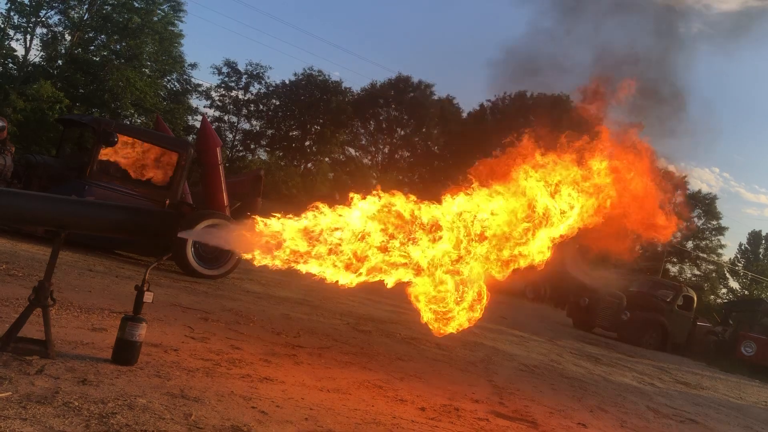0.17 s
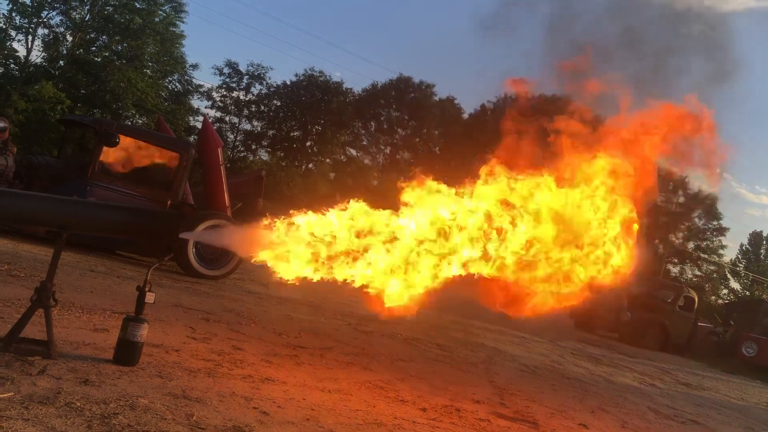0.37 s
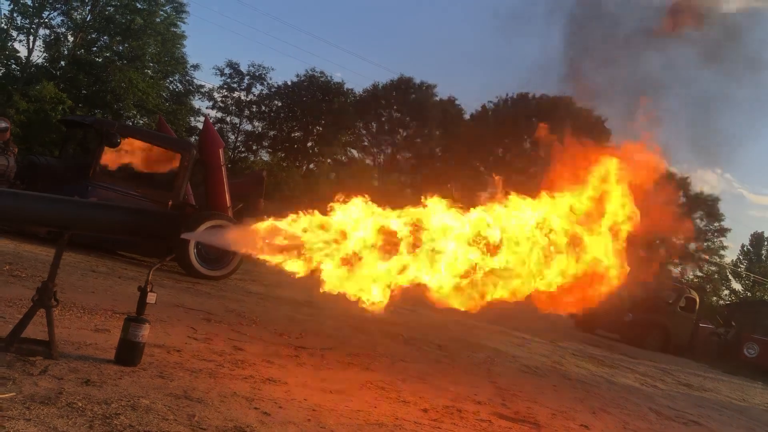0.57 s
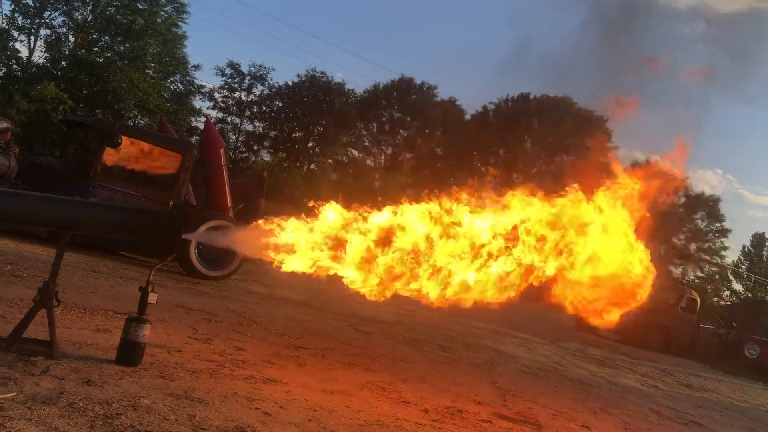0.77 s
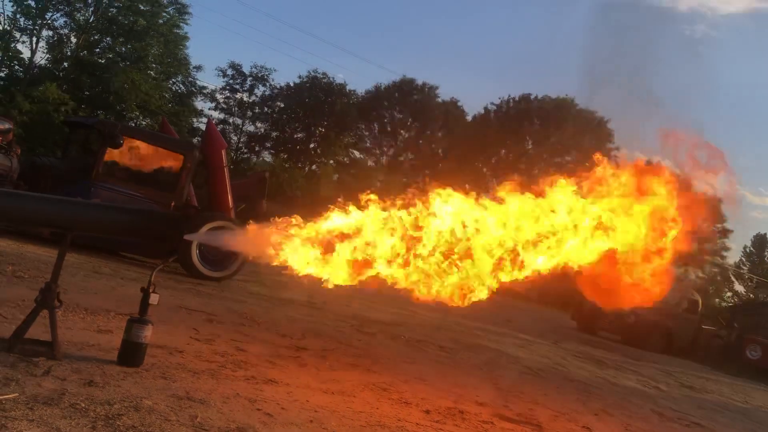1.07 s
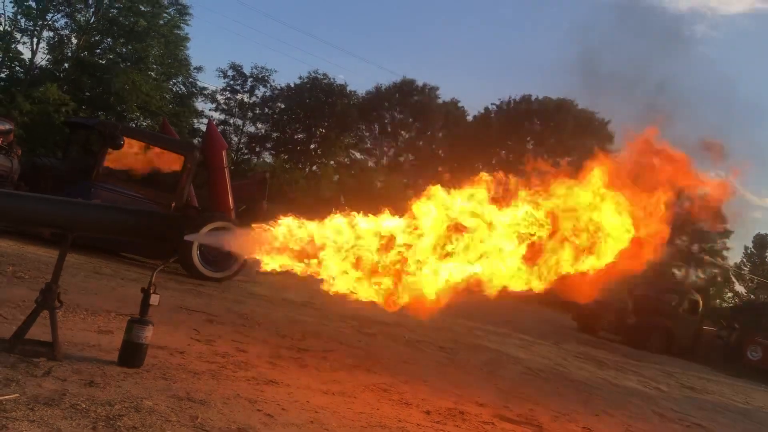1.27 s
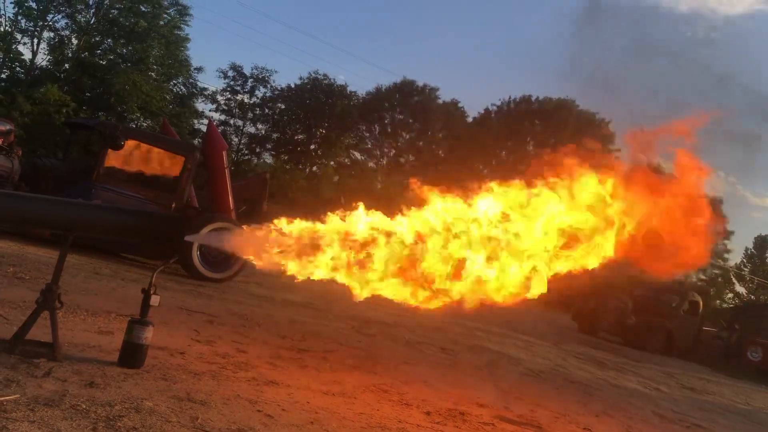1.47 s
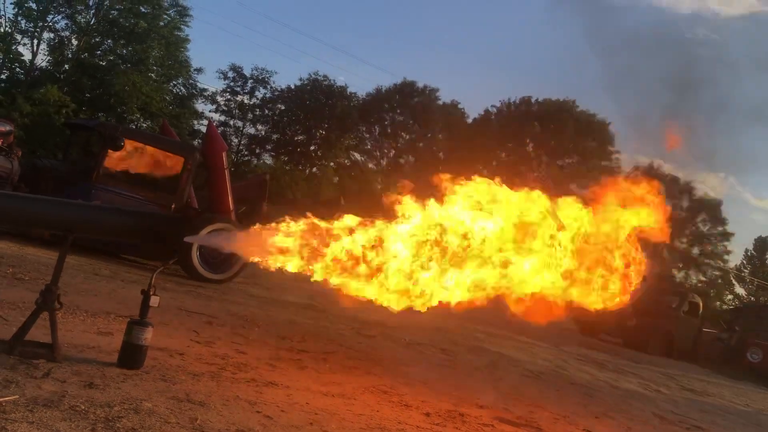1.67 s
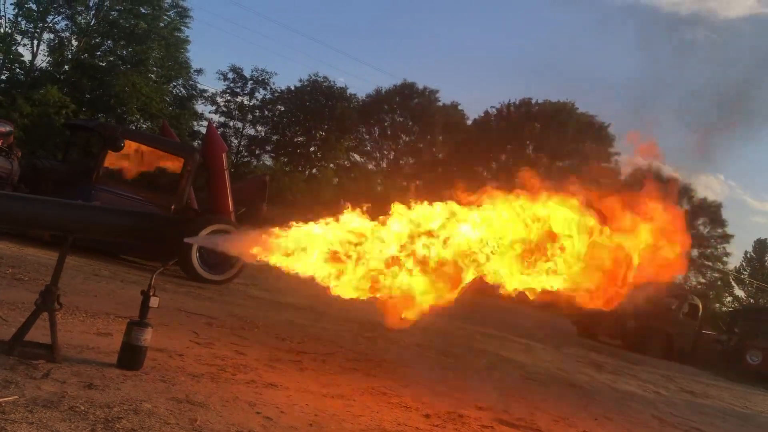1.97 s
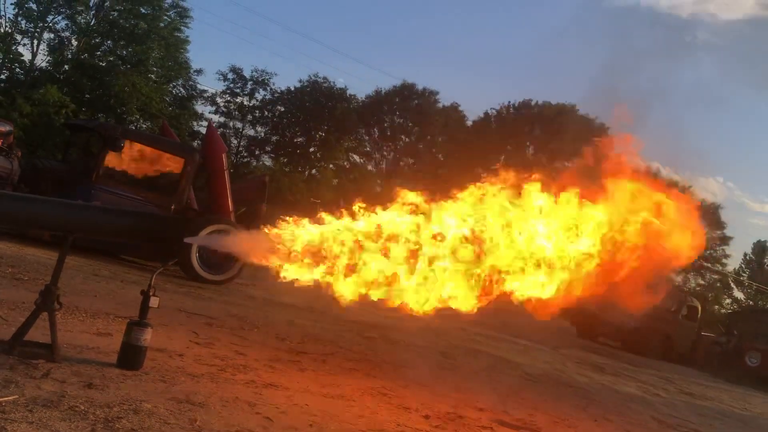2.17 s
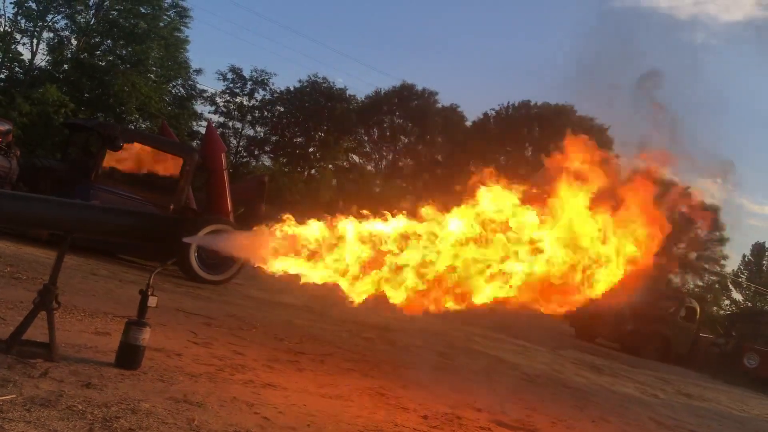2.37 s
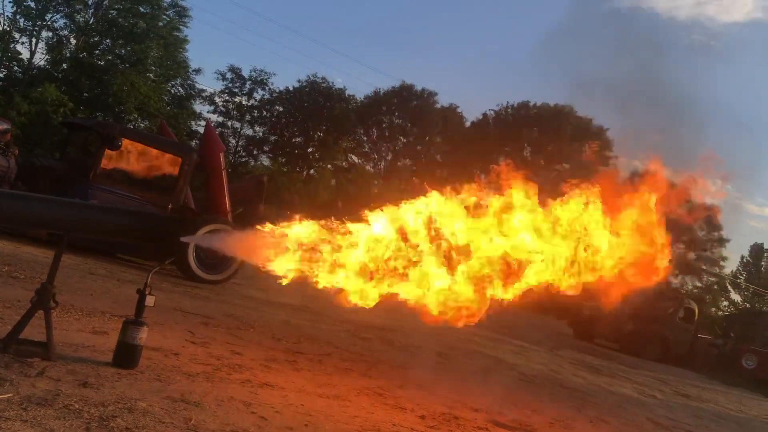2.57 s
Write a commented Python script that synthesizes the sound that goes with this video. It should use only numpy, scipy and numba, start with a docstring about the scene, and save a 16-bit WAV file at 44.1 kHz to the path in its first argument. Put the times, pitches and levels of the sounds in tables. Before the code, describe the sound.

Loud gas burner already at full blast outdoors: heavy, wavering low drone and turbulent rumble, faint hollow tube ringing and strong gas hiss, steady to the end, close microphone slightly squashed by the loudness.

```python
"""Roaring gas burner

A large gas burner throws a steady jet of flame across open ground.
A wavering low tone near 65 Hz makes the throb; shaped noise makes the roar, ringing tube, rush and hiss.
The rush and the nozzle's hiss pulse with each throb and flutter.
The recorder's limiter ducks everything at the strongest surges."""
import sys
import numpy as np
from scipy import signal
from scipy.fft import rfft, irfft
from scipy.io import wavfile
from numba import njit

SR = 44100
rng = np.random.default_rng(int(sys.argv[2]) if len(sys.argv) > 2 else 0)


def master(y):
    """Save y as 16-bit WAV."""
    cut = np.clip(np.atleast_2d(y).T, -1, 1)
    pcm = np.round(cut * 32767)  # scale
    wavfile.write(sys.argv[1], SR, pcm.astype(np.int16))


N = 120393  # length in samples

# Loudness of the throb over time. Each row: time in seconds, level in dB before THROB_DB is added.
THROB_LEVEL = [(0.04, -40), (0.14, -12.5), (0.23, -37), (0.33, -12.5), (0.44, -18), (0.61, -12.5),
               (0.69, -31.5), (0.77, -17), (0.83, -21), (0.94, -10.5), (1.07, -23.5), (1.13, -15.5),
               (1.55, -13.5), (1.58, -20), (2.14, -16.5), (2.27, -22), (2.35, -15), (2.73, -16.5)]
# Speed of the throb over time. Each row: time in seconds, rate in Hz before the wander.
THROB_RATE = [(0.25, 64.2), (0.99, 64.0), (1.09, 62.6), (1.24, 64.8), (1.98, 65.25), (2.07, 64.3),
              (2.29, 64.17), (2.69, 66.1), (2.73, 67)]
# Loudness of the roar over time. Each row: time in seconds, level in dB before ROAR_DB and the swell.
ROAR_LEVEL = [(0.04, -13), (0.98, -12), (1.01, -15), (1.69, -12), (1.79, -16), (1.83, -11), (2.15, -13),
              (2.29, -11.5), (2.32, -9), (2.73, -15)]
# Tone colour of the turbulent burning. Each row: frequency in Hz, relative strength in dB per Hz.
ROAR_SPECTRUM = [(15, -31), (32, -28), (45, -10), (62, -9), (80, -3), (100, 2), (122, -2.5), (155, 1),
                 (195, -5.5), (235, -5), (265, -11), (310, -11.5), (340, -18), (480, -25), (720, -32),
                 (1200, -51), (2500, -79)]
# Resonances of the burner tube. Each row: frequency in Hz, width in Hz, relative strength in dB.
TUBE_RESONANCES = [(364.4, 19, 1), (406, 8.8, -4), (452.7, 16.6, -5), (483.4, 12.5, -8), (536.7, 8.6, -7.5),
                   (583, 14, -10.5), (662, 12, -11.5), (793, 21, -16)]
# Tone colour of the rush at the flame's root. Each row: frequency in Hz, relative strength in dB per Hz.
RUSH_SPECTRUM = [(400, -7.5), (750, -8.5), (1000, -2), (1150, 0), (1370, -0.5), (1600, 0), (1850, -5),
                 (2150, -8.5), (2500, -15), (3300, -21)]
# Tone colour of gas leaving the nozzle. Each row: frequency in Hz, relative strength in dB per Hz.
HISS_SPECTRUM = [(1400, -41), (2300, -13.5), (2500, -12), (2950, -5.5), (3400, -6.5), (3650, -7),
                 (4450, -9), (5150, -2.5), (5480, -1.5), (5800, -5), (6100, -11.5), (6450, -7.5),
                 (6830, -3), (7250, -3), (7550, -8.5), (7900, -7.5), (8450, -4.5), (8950, -1.5), (9350, -4),
                 (9780, -17.5), (10000, -7), (10300, -4.5), (10950, -3.5), (11420, -9), (11800, -6.5),
                 (12130, 1), (12850, -2.5), (13100, -16), (13450, -3), (13760, 6), (13950, -6),
                 (14130, 2.5), (14550, -2.5), (14950, -4), (15300, -1.5), (15660, -1)]
# Loudness of the hiss over time. Each row: time in seconds, level in dB before HISS_DB and the motions.
HISS_LEVEL = [(0.06, -20.5), (0.61, -18.5), (0.63, -18.5), (0.97, -20), (1.04, -20), (1.37, -19.5),
              (1.46, -19.5), (1.97, -21), (2.28, -18.5), (2.51, -20), (2.54, -19.5), (2.73, -20)]
# Reflections from the ground and the burner's frame. Each row: delay in seconds, level in dB.
ECHOES = [(.0031, -26), (.0074, -17.5), (0.0129, -16.5), (0.0237, -16)]

# Levels in dB: THROB_DB, ROAR_DB and HISS_DB are added to the level tables
THROB_DB, ROAR_DB, TUBE_DB, RUSH_DB, HISS_DB = 0.5, 1.25, -26, -26.5, 1
# How far the levels move, in dB
ROAR_SWELL_DB = 0.5
RUSH_PULSE_DB, RUSH_FLUTTER_DB = 1.1, 1.33
HISS_PULSE_DB, HISS_FLUTTER_DB, HISS_PATCHY_DB, SPIT_DB = 1.0, 0.21, 0.76, 0.72
# How fast they move, in Hz
FLUTTER_HZ, SPIT_HZ = 70.4, 600
THROB_WANDER = 0.02  # spread of the throb's rate, as a fraction
START_S, ATTACK_S = 0.0358, 0.0013  # silence before the sound, then a quick fade-in
LIMIT, LIMIT_ATTACK_S, LIMIT_RELEASE_S = 0.67, 0.00042, 0.047  # limiter threshold (full scale 1) and times
CEILING = 0.88  # rounded peaks stay below this (full scale 1)
TOP_HZ = 15750  # highest frequency kept


def undb(db):
    """Turn dB into a plain multiplier."""
    return 10 ** (np.asarray(db) / 20)


def unit(x):
    """Scale to an average (rms) strength of 1."""
    return x / np.sqrt(np.mean(x ** 2))


def frequencies():
    """Frequency in Hz of each spectrum bin of the whole sound."""
    return np.fft.rfftfreq(N, 1 / SR)


def noise_spectrum():
    """Spectrum of fresh white noise."""
    return rfft(rng.standard_normal(N))


def curve(rows):
    """Join rows of (seconds, value) by straight lines."""
    return np.interp(np.arange(N) / SR, *np.array(rows, float).T)


def walk(hz):
    """Smooth random wander of spread 1, with changes up to about hz."""
    f = frequencies()
    gain = (f > 0) / np.sqrt(1 + (f / hz) ** 4)
    return unit(irfft(noise_spectrum() * gain, N))


def turbulence(points):
    """Noise with a spectrum of (Hz, dB) points, falling steeply beyond its ends."""
    f = frequencies() + 1  # the extra 1 Hz avoids the logarithm of zero
    hz, db = np.array(sorted(points), float).T
    shape = undb(np.interp(np.log(f), np.log(hz), db))
    low_edge = np.minimum(f / hz[0], 1) ** 4
    high_edge = np.minimum(hz[-1] / f, 1) ** 4
    return unit(irfft(noise_spectrum() * shape * low_edge * high_edge, N))


def bands(x, count):
    """Split a sound into equally wide bands up to TOP_HZ; the last also takes what lies above."""
    spectrum = rfft(x)
    index = np.minimum(frequencies() * count // TOP_HZ, count - 1)
    return [irfft(spectrum * (index == k), N) for k in range(count)]


@njit
def follow(x, attack, release):
    """Follow the peaks of a sound: quick up, slow down."""
    out, level = np.empty(len(x)), 0.
    for i in range(len(x)):
        step = attack if x[i] > level else release
        level += (x[i] - level) * step
        out[i] = level
    return out


def throb(cycle):
    """The flame and the burner tube swing together in one low tone."""
    tone = np.sqrt(2) * np.sin(cycle)  # rms 1
    return tone * undb(curve(THROB_LEVEL) + THROB_DB)


def roar():
    """Big burning eddies rumble and swell."""
    level_db = curve(ROAR_LEVEL) + ROAR_DB + ROAR_SWELL_DB * walk(hz=32)
    return turbulence(ROAR_SPECTRUM) * undb(level_db)


def tube():
    """The turbulence rings the burner tube: noise passes through its narrow resonances."""
    f = frequencies()
    rings = 0
    for hz, width, db in TUBE_RESONANCES:
        resonance = undb(db) / (1 + 2j * (f - hz) / width)
        rings = rings + resonance * noise_spectrum()
    return unit(irfft(rings, N)) * undb(TUBE_DB)


def rush(pulse, flutter):
    """Small eddies at the root of the flame pulse and flutter with the gas flow."""
    level_db = RUSH_DB + RUSH_PULSE_DB * pulse + RUSH_FLUTTER_DB * flutter
    return turbulence(RUSH_SPECTRUM) * undb(level_db)


def hiss(pulse, flutter):
    """Gas hisses from the nozzle, pulsing with the throb, fluttering and spitting finely."""
    gas = 0
    for band in bands(turbulence(HISS_SPECTRUM), count=6):
        gas = gas + band * undb(HISS_PATCHY_DB * walk(hz=60))  # each band flickers on its own
    motion_db = HISS_PULSE_DB * pulse + HISS_FLUTTER_DB * flutter + SPIT_DB * walk(SPIT_HZ)
    return gas * undb(curve(HISS_LEVEL) + HISS_DB + motion_db)


def surroundings(x):
    """Nearby surfaces add faint delayed copies that ripple the spectrum."""
    f = frequencies()
    response = 1 + sum(undb(db) * np.exp(-2j * np.pi * f * delay) for delay, db in ECHOES)
    return irfft(rfft(x) * response, N)


def scene():
    """Add the throb, roar, tube, rush and hiss of one flame; only the hiss gets reflections."""
    rate = curve(THROB_RATE) * (1 + THROB_WANDER * walk(hz=7.8))
    cycle = 2 * np.pi * np.cumsum(rate) / SR
    pulse = -np.sin(cycle)  # the gas flows fastest when the pressure is low
    flutter = walk(FLUTTER_HZ)  # shared by the rush and the hiss
    flame = throb(cycle) + roar() + tube() + rush(pulse, flutter)
    flame = flame + surroundings(hiss(pulse, flutter))
    fade_in = np.clip((np.arange(N) / SR - START_S) / ATTACK_S, 0, 1)
    return (flame * fade_in)[None]


def record(dry):
    """A limiter holds down the surges, the last peaks are rounded, and the top is cut."""
    attack = 1 - np.exp(-1 / (LIMIT_ATTACK_S * SR))
    release = 1 - np.exp(-1 / (LIMIT_RELEASE_S * SR))
    peak = follow(np.abs(dry[0]), attack, release)
    held = dry * LIMIT / np.maximum(peak, LIMIT)
    rounded = held / (1 + (held / CEILING) ** 20) ** (1 / 20)
    top_cut = signal.ellip(12, .05, 60, TOP_HZ, fs=SR, output="sos")
    return signal.sosfiltfilt(top_cut, rounded)


dry = scene()
out = record(dry)
master(out)
```